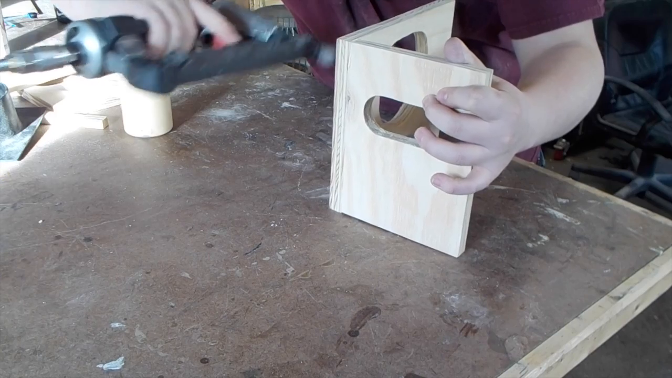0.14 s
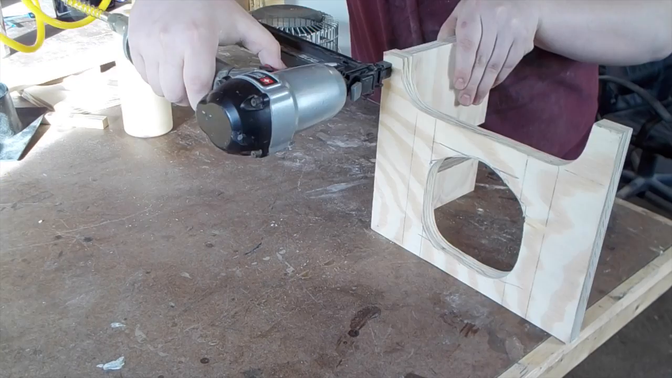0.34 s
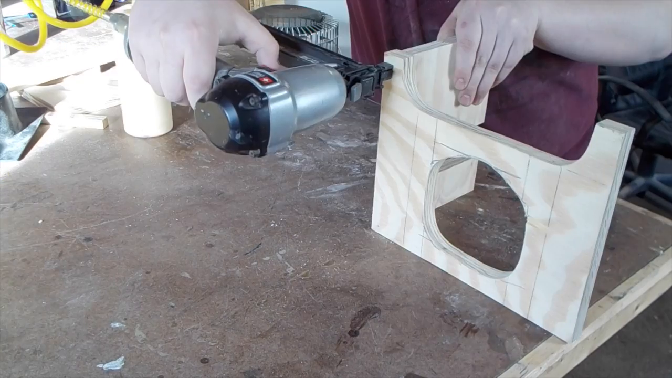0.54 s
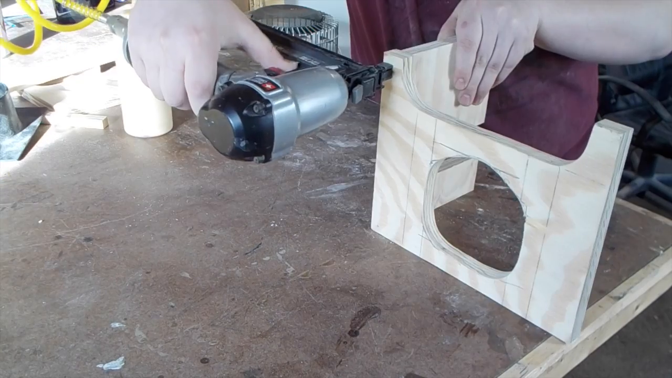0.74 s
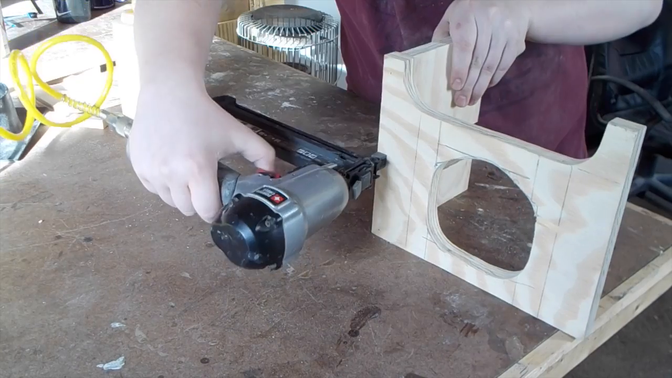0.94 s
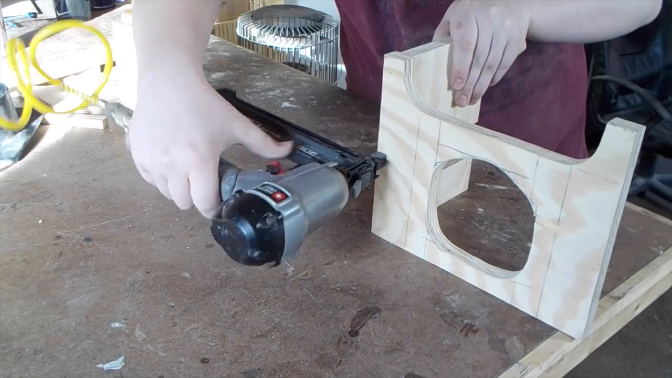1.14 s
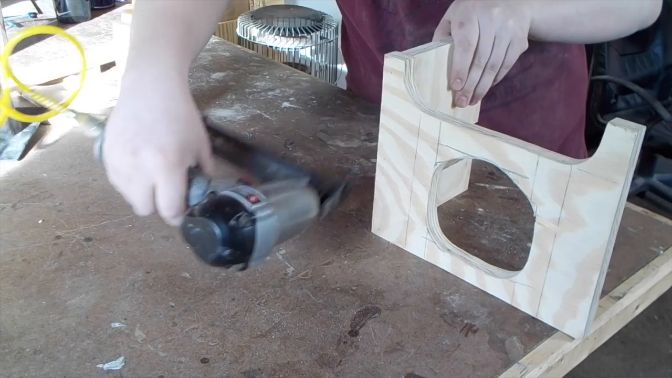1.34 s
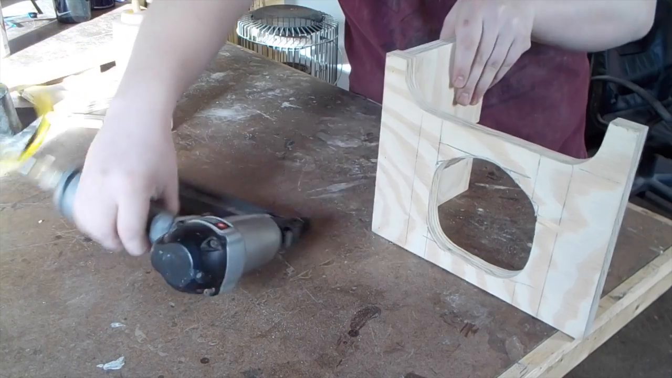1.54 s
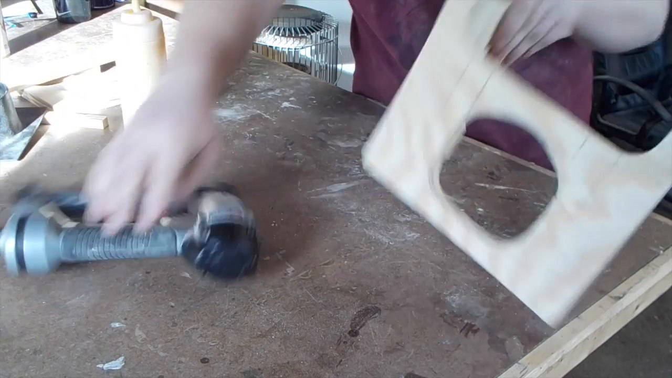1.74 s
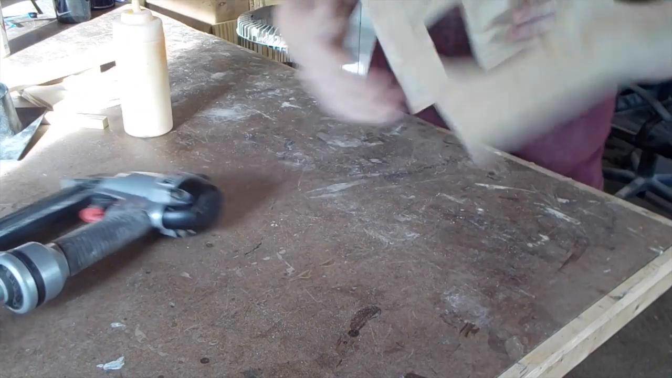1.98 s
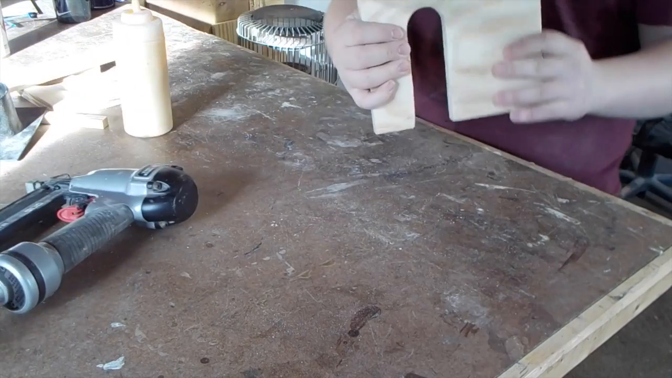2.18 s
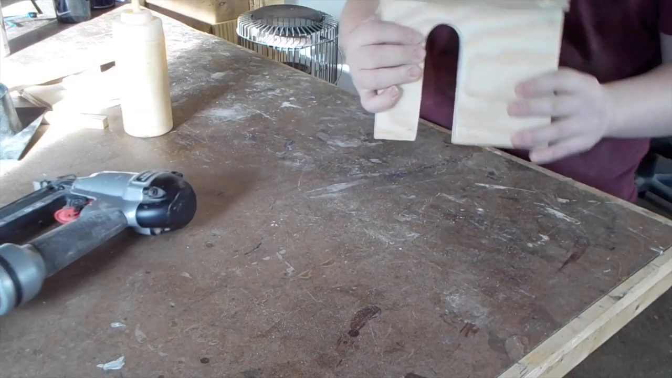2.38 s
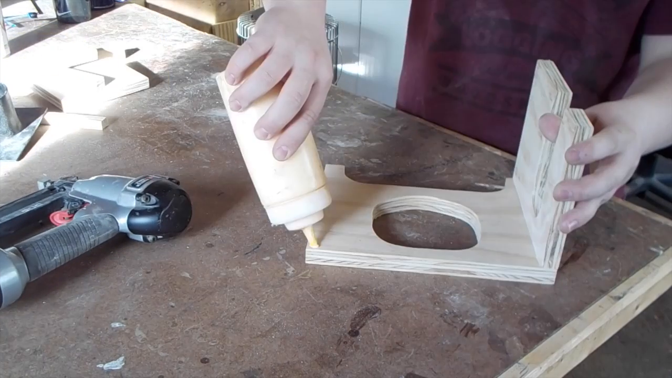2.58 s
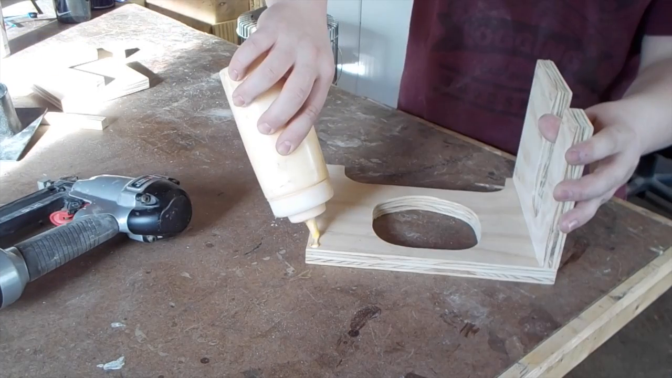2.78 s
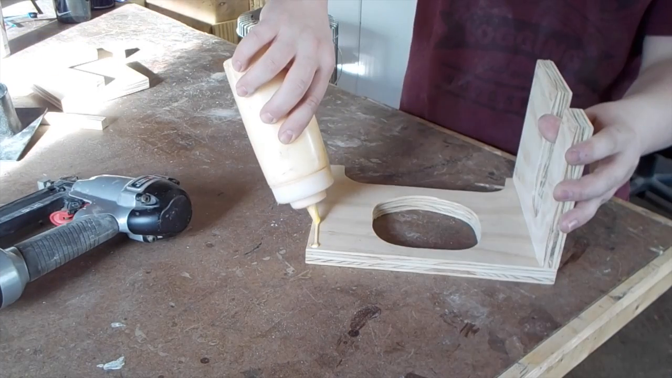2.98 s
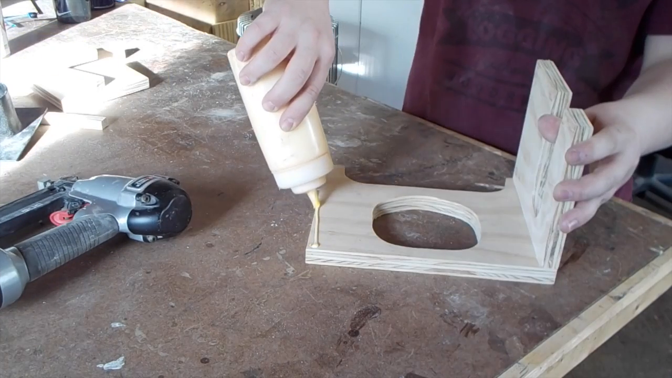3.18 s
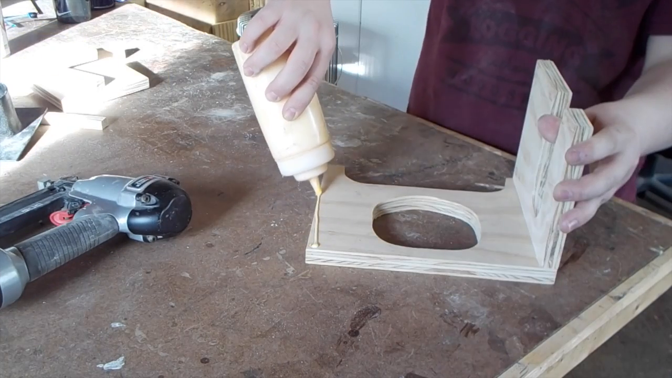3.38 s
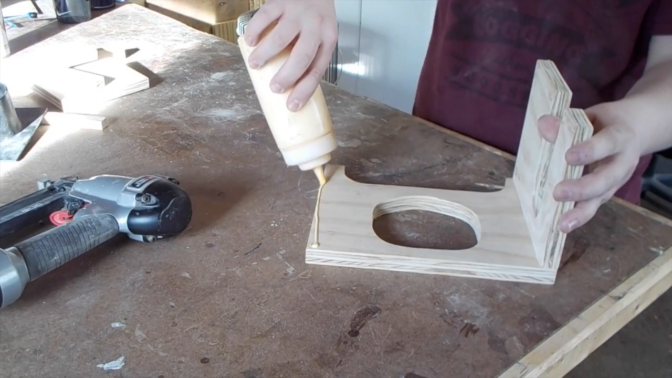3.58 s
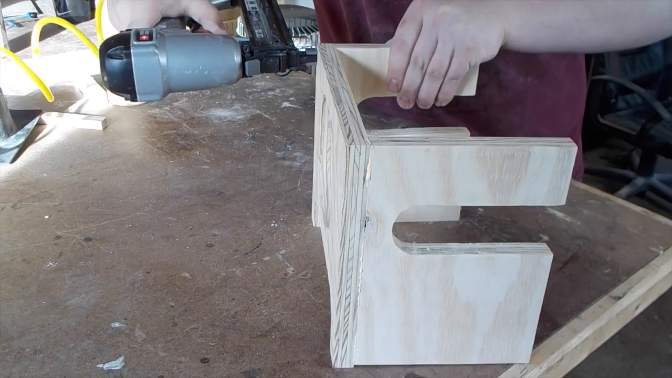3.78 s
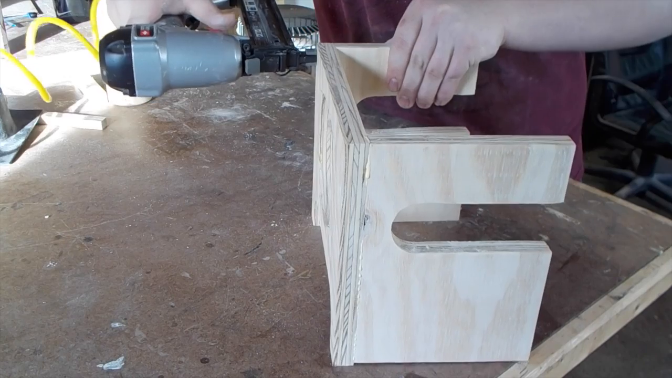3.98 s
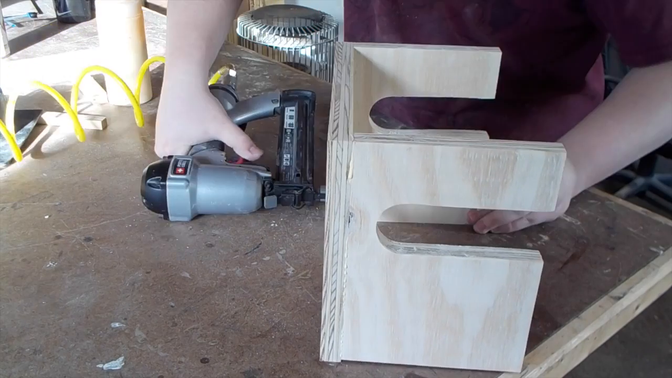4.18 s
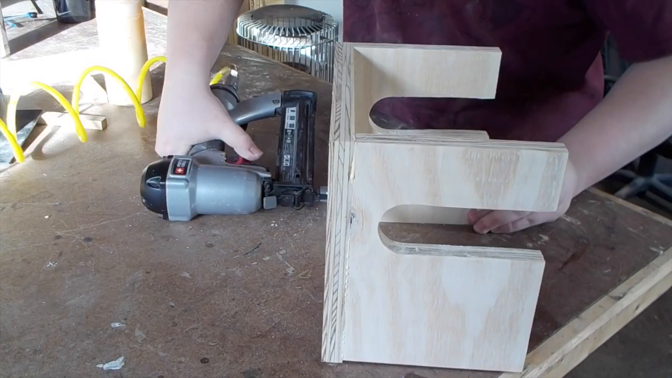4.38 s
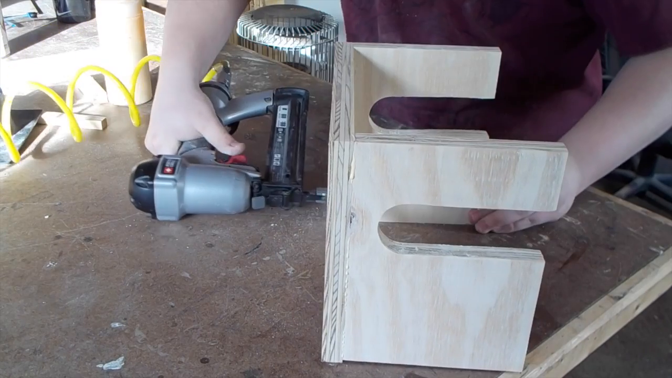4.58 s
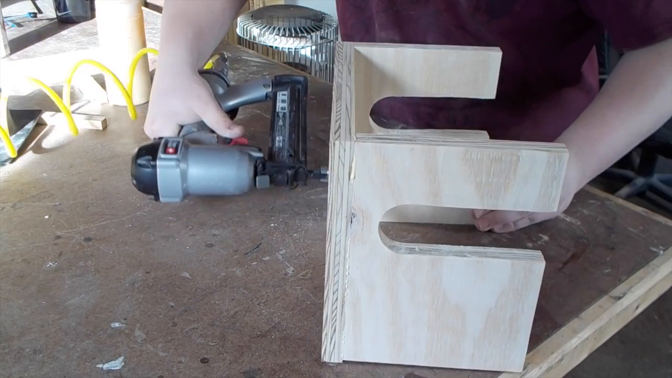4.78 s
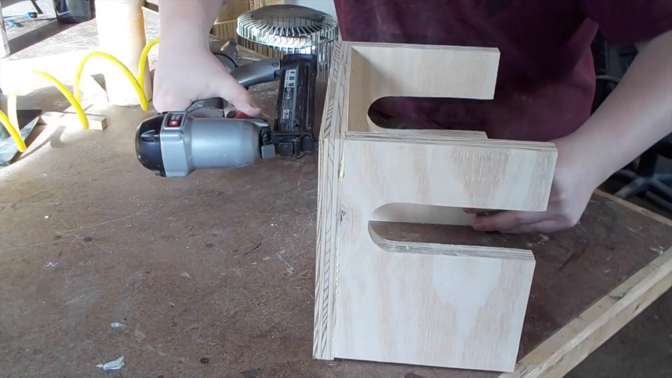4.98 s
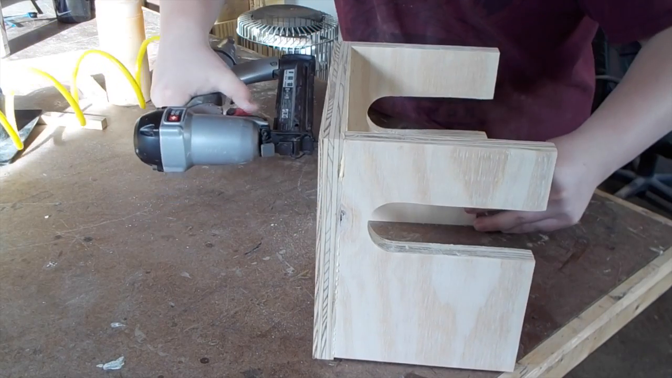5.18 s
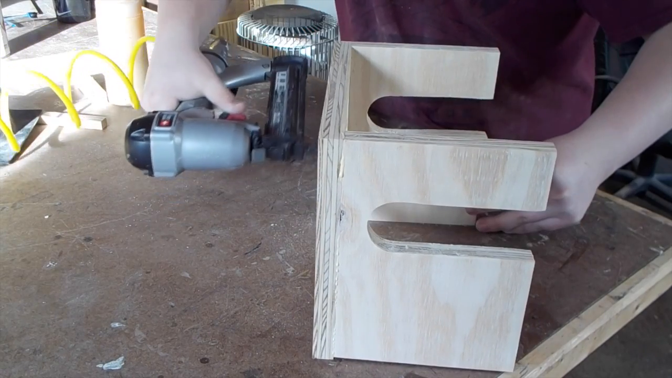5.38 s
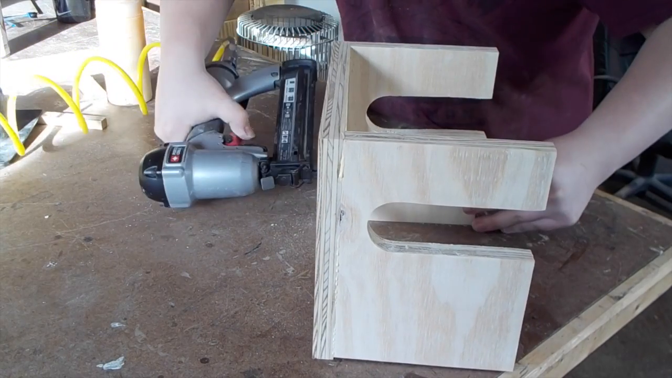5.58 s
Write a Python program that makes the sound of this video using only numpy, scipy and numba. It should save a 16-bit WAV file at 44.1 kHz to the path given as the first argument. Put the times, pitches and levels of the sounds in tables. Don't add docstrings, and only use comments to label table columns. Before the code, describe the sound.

Close, limited stereo sound in a live workshop: exhaust air, soft bench taps, two nailer shots with puffing releases, then a busy clatter of hollow plywood knocking, rocking and sliding on the bench, ending in small clicks. Near silence with faint hush follows, then three more sharp shots on duller wood, a tiny nudge between, and one last hiss as the trigger is pulled.

```python
import sys
import numpy as np
from scipy import signal
from scipy.fft import rfft, irfft, next_fast_len
from scipy.io import wavfile
from scipy.ndimage import uniform_filter1d, map_coordinates
from numba import njit

SR = 44100
rng = np.random.default_rng(int(sys.argv[2]) if len(sys.argv) > 2 else 0)


def wav_record(signal):
    frames = np.transpose(np.atleast_2d(signal))
    bounded = np.clip(frames, -1, 1)
    quanta = np.round(bounded * 32767).astype(np.int16)
    wavfile.write(sys.argv[1], SR, quanta)


def amplitude_ratio(level_db):
    exponent = np.asarray(level_db, float) / 20
    return 10 ** exponent


N = 248283
LEAD = 4410

# valve opens t/s, driver travel/s, blow level/dB, panel f/Hz, panel level/dB
SHOTS = [
    (0.4764, 0.046, -15.5, 1427, 5),
    (0.9368, 0.034, -14.5, 1927, 2.5),
    (3.8446, .0398, -13, 1870, 11.5),
    (4.2842, 0.033, -7, 1187, 0),
    (5.0944, .0466, -13, 1080, 9),
    (5.6145, 0.032, -12, 1300, 5),
]


def along(points, hz):
    f, v = np.transpose(points)
    return np.interp(np.log(hz + 1), np.log(f + 1), v)


def filtered(x, response):
    m = next_fast_len(x.shape[-1] + SR // 4)
    spectrum = rfft(x, m) * response(np.fft.rfftfreq(m, 1 / SR))
    return irfft(spectrum, m)[..., :x.shape[-1]]


def causal(points):
    def response(hz):
        cepstrum = irfft(np.log(amplitude_ratio(along(points, hz))), 2 * len(hz) - 2)
        cepstrum[1:len(hz)] *= 2
        cepstrum[len(hz):] = 0
        return np.exp(rfft(cepstrum))
    return response


def highpass(hz, corner_hz):
    return 1j * hz / corner_hz / (1 + 1j * hz / corner_hz)


def treble(hz, top_hz=16000):
    return highpass(hz, 3000) ** 2 / (1 + 1j * hz / top_hz) ** 2


def wood(hz):
    # f/Hz, width/Hz, level/dB
    modes = [(230, 160, 2.5), (432, 59, 7), (605, 89, 1.5), (667, 22, -2), (1135, 1180, 0.5),
             (1790, 4800, -1.5)]
    total = 0
    for k, (centre, width, db) in enumerate(modes):
        mode = 1j * hz * width / (centre * centre - hz * hz + 1j * hz * width)
        total = total + (-1) ** k * amplitude_ratio(db) * mode
    return total


def pair(n):
    # f/Hz, likeness (0 to 1)
    likeness = [(200, 0.98), (1500, 0.93), (3000, 0.91), (6000, 0.44), (12000, 0.38)]

    def mid_side(hz):
        angle = np.arccos(np.clip(along(likeness, hz), -1, 1)) / 2
        return np.array([np.cos(angle), np.sin(angle)])

    mid, side = filtered(rng.standard_normal((2, n)), mid_side)
    return np.array([mid + side, mid - side])


def ping(s, db, hz, t60):
    age = np.clip((np.arange(N + LEAD) - LEAD) / SR - s, 0, 1)
    onset = np.clip(age / 0.00063, 0, 1)
    return amplitude_ratio(db - 60 * age / t60) * np.sin(2 * np.pi * hz * age) * onset


def add(track, s, db, rise, hold, t60, rough_db=0., spike=True):
    t = np.arange(SR // 8) / SR
    flutter = amplitude_ratio(rough_db * np.repeat(rng.standard_normal(len(t) // 50 + 1), 50)[:len(t)])
    decay = amplitude_ratio(db - 60 * np.clip(t - rise - hold, 0, 1) / t60)
    shape = np.clip(t / rise, 0, 1) ** 2 * decay
    burst = shape * flutter * rng.standard_normal(len(t))
    echo = np.linalg.norm(shape) * (np.arange(len(t)) == 40) if spike else burst
    part = track[:, LEAD + round(s * SR):][:, :len(t)]
    part += np.array([burst, echo])[:, :part.shape[1]]


def floor():
    # f/Hz, level/dB
    hush_curve = [(100, -1.5), (400, -7), (1500, -6), (5000, 3.5), (7000, 4.5), (12000, 13)]
    hush = filtered(pair(N), lambda hz: amplitude_ratio(along(hush_curve, hz) - 49))
    start_s, length_s, edge_s, rumble_db = 2.92, .26, .06, -41
    age = np.arange(N) / SR - start_s
    swell = np.clip(np.minimum(age, length_s - age) / edge_s, 0, 1)
    rumble = amplitude_ratio(rumble_db) * swell * rng.standard_normal(N)
    return hush + filtered(rumble, lambda hz: (1j * hz * 110 / (260 ** 2 - hz * hz + 1j * hz * 110)) ** 2)


def workshop(x):
    changes = [0, .4, .9, 2.595, 4.27, 6]
    # f/Hz, T60/s
    decay_times = [(150, 0.21), (1000, 0.44), (3500, 0.43), (6000, 0.38), (12000, 0.3), (16000, 0.065)]
    # f/Hz, phase between the microphone ports/rad
    port_phase = [(300, 0.31), (2000, 0.15), (5000, 0.29), (9000, 0.3), (16000, 0.67)]
    out = filtered(x[0], lambda hz: np.exp(np.outer([.5j, -.5j], along(port_phase, hz))))
    edges = [LEAD * (s > 0) + round(s * SR) for s in changes[:-1]] + [N + LEAD]
    step = round(.4 * SR)
    for a, b in zip(edges, edges[1:]):
        for start in range(a, b, step):
            hz, t, z = signal.stft(pair(SR // 2), SR, nperseg=256)
            decay = amplitude_ratio(-60 * t / along(decay_times, hz)[:, None])
            tail = signal.istft(z * decay, SR, nperseg=256)[1]
            tail = amplitude_ratio(-0.5) * tail / np.linalg.norm(tail[0])
            tail = np.pad(tail, ((0, 0), (120, 0)))
            heard = x[1:, start:min(start + step, b)]
            answer = signal.fftconvolve(heard, tail, axes=1)[:, :b - start]
            out[:, start:start + answer.shape[1]] += answer
        left = b - np.arange(a, b) + N * (b == edges[-1])
        out[:, a:b] *= np.clip(left / (0.0147 * SR), 0, 1) ** 2
    return out[:, LEAD:]


def bench():
    # t/s, peak level/dB, hardness/dB
    dead_knocks = [
        (0.305, -30.5, -22),
        (0.337, -35.5, -13),
        (0.378, -28, 23),
        (1.630, -22, 16),
        (1.705, -25, 19),
        (1.928, -17, 5),
        (1.937, -29, -23),
        (2.259, -37, -21),
        (4.834, -46, 12),
    ]
    # t/s, peak level/dB, hardness/dB
    box_knocks = [(1.528, -25, 27.5), (1.593, -3, 7), (1.689, -7.5, 6.5), (1.738, -16.5, -60),
                  (1.762, -22.5, -34), (1.813, -13.5, -40), (2.123, -18, -30), (2.165, -22, -4),
                  (2.51, -42, -21), (3.816, -48, 5), (4.893, -38.5, -20)]
    # t/s, peak level/dB
    rocking = [
        (1.622, -28),
        (1.742, -17.5),
        (1.763, -18),
        (1.802, -17.5),
        (1.819, -21.5),
        (1.883, -21.5),
        (1.905, -33.5),
    ]
    # t/s, peak level/dB, f/Hz
    loose = [
        (2.324, -43, 1800),
        (2.338, -17, 2860),
        (2.342, -34, 1700),
        (2.375, -31, 1800),
    ]
    # t/s, sound pressure level/dB
    drags = [
        [(1.61, -28), (1.7, -28), (1.745, -22), (1.912, -23), (2.056, -31.5), (2.184, -31), (2.276, -48),
         (2.5, -44), (2.59, -85)],
        [(4.83, -35.5), (4.896, -68), (5.0, -72)],
    ]

    thud, tick, ring, rasp = np.zeros((4, 2, N + LEAD))
    knocks = [(*row, -25) for row in dead_knocks] + [(*row, 17) for row in box_knocks]
    for s, db, treble_db, ring_db in knocks:
        add(thud, s, db + 1, rise=0.00034, hold=0.0069, t60=0.0071)
        add(tick, s, db + treble_db - 6.5, rise=0.00038, hold=0.0051, t60=0.017)
        add(ring, s, db + ring_db - 11.5, rise=0.0005, hold=0.0041, t60=0.013, spike=False)

    hollow_hz, hollow_t60, loose_t60 = 421, .05, 0.015
    notes = [(s, db, hollow_hz, hollow_t60) for s, db in rocking] + [(*row, loose_t60) for row in loose]
    for s, db, hz, t60 in notes:
        thud += amplitude_ratio([[0], [-12]]) * ping(s, db + 5.0, hz, t60)

    t = (np.arange(N + LEAD) - LEAD) / SR
    unevenness = map_coordinates(rng.standard_normal(800), [(t + 0.138) * 120])
    slips = amplitude_ratio([[1.5], [-3]]) * amplitude_ratio(3.5 * unevenness)
    rattle_per_s, rattle_db, scatter_db = 70, 24, 4
    hits = rng.random(len(t)) < rattle_per_s / SR
    chatter = hits * amplitude_ratio(rattle_db + scatter_db * rng.standard_normal(len(t)))
    rub_db, rasp_db = -7.5, 8.5
    for rows in drags:
        s, db = np.transpose(rows)
        rub = slips * rng.standard_normal(len(t)) + chatter
        ring += amplitude_ratio(np.interp(t, s, db + rub_db, -150, -150)) * rub
        rasp += amplitude_ratio(np.interp(t, s, db + rasp_db, -150, -150)) * slips * rng.standard_normal(len(t))
    tick += filtered(rasp, lambda hz: 1 / (1 + 1j * hz / 7000) ** 4)
    thud = filtered(thud, lambda hz: highpass(hz, 400) * highpass(hz, 250) / (1 + 1j * hz / 2600) ** 3)
    return thud + filtered(tick, treble) + filtered(ring, wood)


def air():
    # t/s, peak level/dB
    releases = [
        (-0.061, -3),
        (0.6688, -7.5),
        (1.1354, -8),
        (3.992, -9.5),
        (4.458, -9),
        (5.2956, -8.5),
    ]
    # f/Hz, level/dB
    valve_curve = [(150, -30.5), (600, -35.5), (2000, -21), (3500, -10.5), (5000, -5), (11000, 6),
                   (16000, -6)]
    # f/Hz, level/dB
    jet_curve = [(150, -20), (600, -26.5), (2000, -20.5), (3500, -6.5), (6000, -6.5), (11000, 4.5),
                 (13500, 0.5), (16000, -17)]
    valve, exhaust = np.zeros((2, 2, N + LEAD))
    for s, travel, *_ in SHOTS:
        add(valve, s - .005, 2, rise=0.0096, hold=travel - .012, t60=0.071, rough_db=3.5, spike=False)
    for s, db in releases:
        add(exhaust, s, db + 24.5, rise=0.0038, hold=0.026, t60=0.034, rough_db=0.5)
    return filtered(valve, causal(valve_curve)) + filtered(exhaust, causal(jet_curve))


def driver():
    # f/Hz, level/dB
    thump_curve = [(100, 10.5), (400, 1), (1400, -1.5), (2200, -3), (4000, -21), (16000, -32)]
    # f/Hz, level/dB
    crack_curve = [(100, -1.5), (600, -3), (1500, 2.5), (2500, 2), (5000, -16.5), (16000, -64)]
    board, steel = np.zeros((2, 2, N + LEAD))
    for opens, travel, db, hz, panel_db in SHOTS[:-1]:
        s = opens + travel
        add(board, s, db + 30, rise=0.0056, hold=0.00017, t60=0.0053)
        add(steel, s, 43 + 0.64 * db, rise=0.0053, hold=0.0011, t60=0.0034)
        board[0] += ping(s + 0.002095, panel_db, hz, t60=0.037)

    def board_response(hz):
        return np.array([causal(thump_curve)(hz), causal(crack_curve)(hz)])

    def steel_response(hz):
        snap = amplitude_ratio(10.5) * highpass(hz, 12000) ** 3
        return np.array([snap, amplitude_ratio(-1.5) * treble(hz, 4030)])

    return filtered(board, board_response) + filtered(steel, steel_response)


def scene():
    return (workshop(air() + driver() + bench()) + floor()) * amplitude_ratio([[.6], [-.6]])


@njit
def follow(wanted, gain, attack, climb, spring):
    out = np.empty_like(wanted)
    for i in range(len(wanted)):
        if wanted[i] < gain:
            gain += attack * (wanted[i] - gain)
        else:
            gain = min(wanted[i], gain + climb - spring * gain)
        out[i] = gain
    return out


def treble_gate(x):
    # f/Hz, level relative to the moment's mean power/dB
    threshold = [(7400, -34), (9500, -35), (11000, -41), (16000, -40)]
    hz, _, z = signal.stft(x, SR, nperseg=1024)
    power = np.mean(np.abs(z) ** 2, 0)
    limit = amplitude_ratio(2 * along(threshold, hz))[:, None] * power.mean(0)
    heard = uniform_filter1d(power, size=9, axis=0) > limit
    kept = heard | (hz < threshold[0][0])[:, None]
    return signal.istft(z * kept, SR, nperseg=1024)[1][:, :N]


def low_pass(x):
    return signal.sosfilt(signal.butter(12, 16680, fs=SR, output="sos"), x)


def record(dry):
    # f/Hz, level/dB
    capsule = [(900, 3), (1900, 2), (2200, -6), (2450, -24.5), (2700, -13.5), (3000, -25), (3400, -15.5),
               (4200, -15), (4900, -5), (6700, -5), (7800, -38.5), (9500, -37), (15600, -40), (16800, -74)]
    # f/Hz, level/dB
    notch = [(7500, 0), (8000, -28), (8900, -8), (9500, -1.5)]
    x = filtered(dry, lambda hz: causal(capsule)(hz) * highpass(hz, 330) ** 2)
    power = signal.lfilter([.012], [1, .012 - 1], np.mean(x ** 2, 0))
    wanted_db = np.minimum(0, -18.5 - 10 * np.log10(power + 1e-12))
    x = x * amplitude_ratio(follow(wanted_db, -17.0, 1 / (0.00032 * SR), 110 / SR, 4 / SR))
    x = x / (1 + np.abs(x / 1.05) ** 4) ** (1 / 4)
    x = x + filtered(pair(N), lambda hz: amplitude_ratio(-65.0) * (hz > 8500) * (hz < 15900))
    x = filtered(x, lambda hz: causal(notch)(hz) * highpass(hz, 200) ** 2)
    excess = np.sign(x) * np.maximum(np.abs(x) - .3, 0)
    x = x + filtered(excess, lambda hz: amplitude_ratio(13.5) * highpass(hz, 11000) ** 4 / (1 + (hz / 16000) ** 40))
    mix = treble_gate(x)
    return low_pass(mix)


dry = scene()
out = record(dry)
wav_record(out)
```